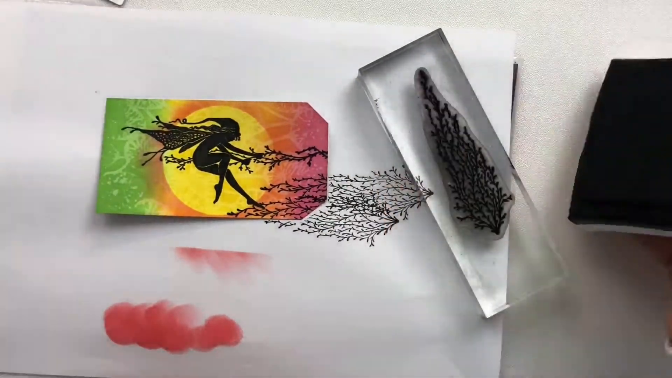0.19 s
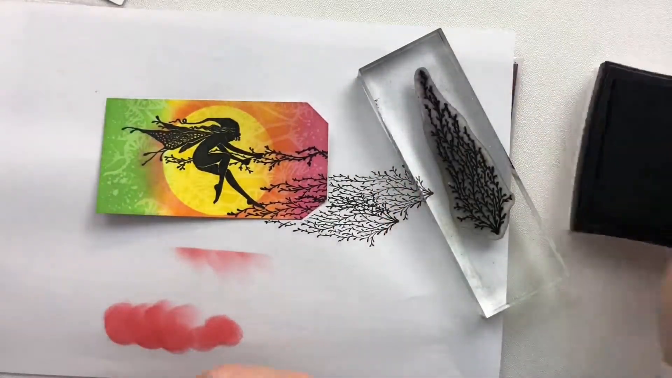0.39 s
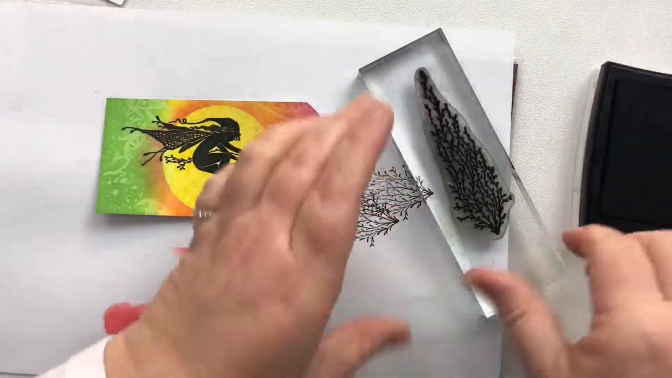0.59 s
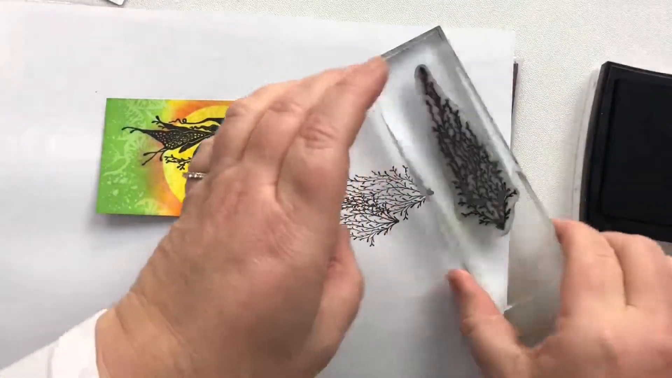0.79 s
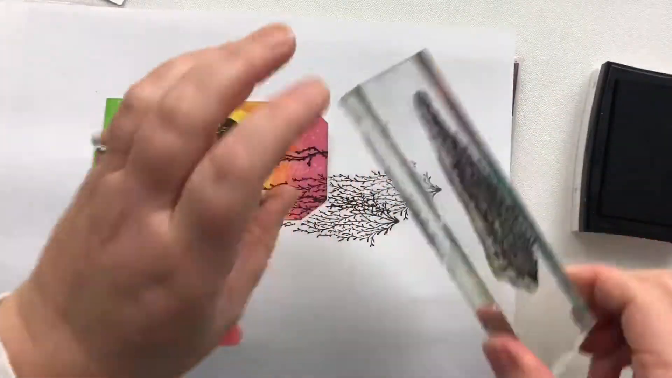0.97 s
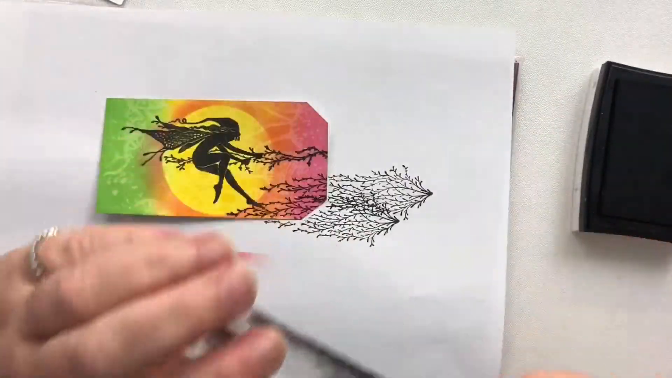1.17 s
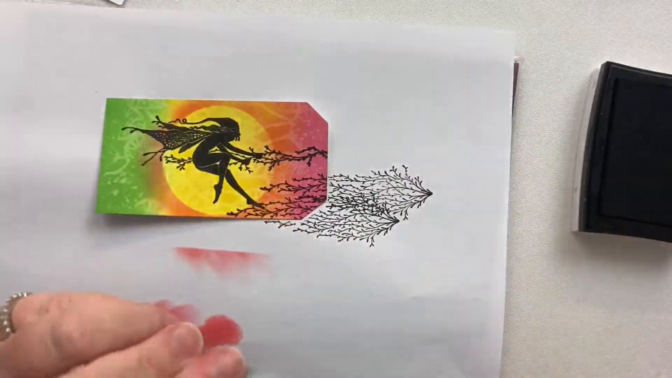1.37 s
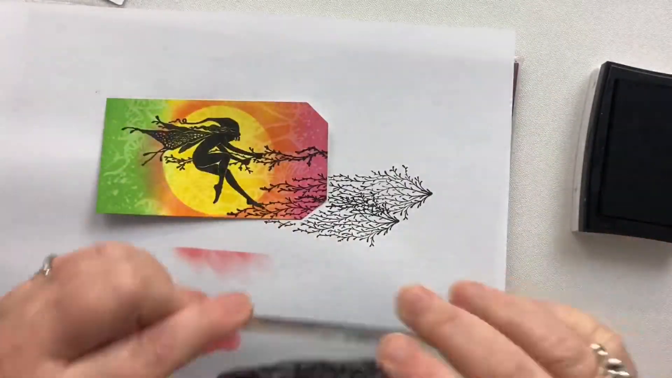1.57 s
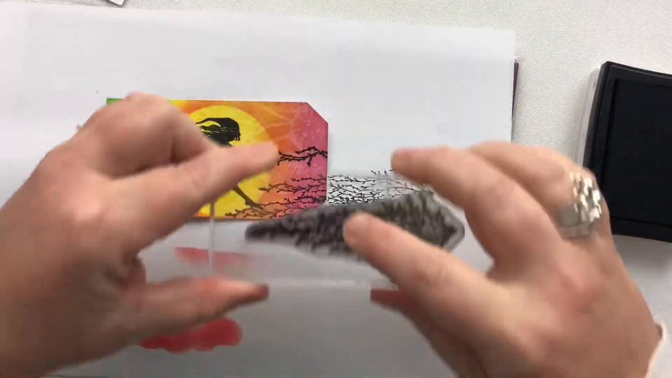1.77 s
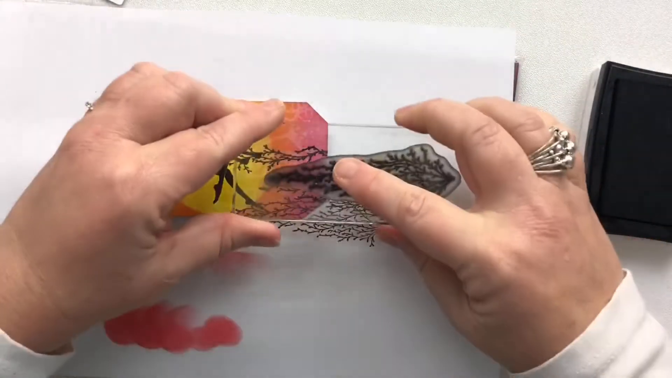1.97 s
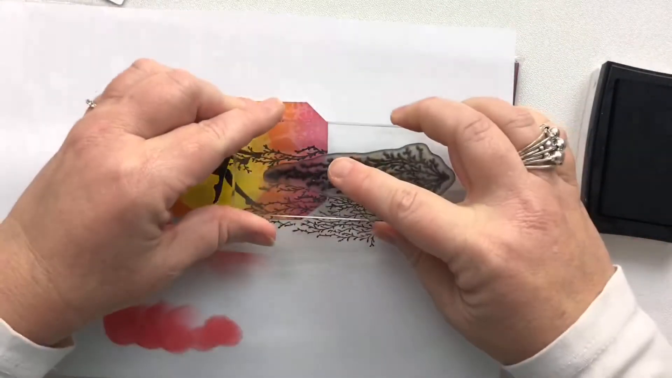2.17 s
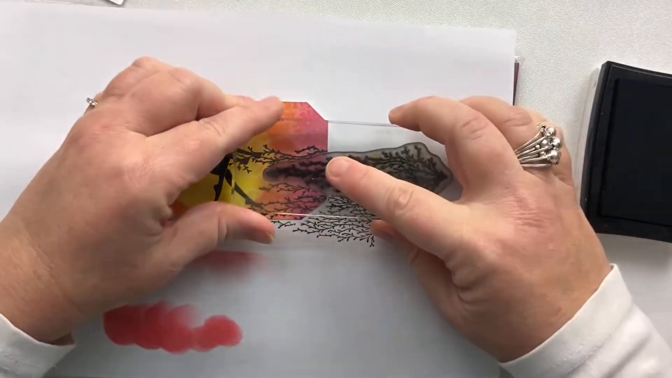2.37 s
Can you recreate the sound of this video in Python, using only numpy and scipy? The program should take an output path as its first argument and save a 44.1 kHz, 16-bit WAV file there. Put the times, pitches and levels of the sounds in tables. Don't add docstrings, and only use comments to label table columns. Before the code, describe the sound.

Hard plastic case drops on a craft desk with two rattling knocks, followed by small block clicks

```python
import sys
import numpy as np
from scipy import signal
from scipy.io import wavfile

SR = 44100
rng = np.random.default_rng(int(sys.argv[2]) if len(sys.argv) > 2 else 0)


def to_linear_factor(level_db):
    exponent = np.asarray(level_db, float) / 20
    return 10 ** exponent


def int16_out(signal):
    q = np.round(np.clip(np.atleast_2d(signal).T, -1, 1) * 32767)
    wavfile.write(sys.argv[1], SR, q.astype(np.int16))


N = 110250


def rms_one(x):
    return x / np.sqrt(np.mean(x ** 2) + 1e-20)


def in_time(rows):
    s, db = np.transpose(rows)
    return to_linear_factor(np.interp(np.arange(N) / SR, s, db))


def dying(t60_s, size):
    return to_linear_factor(-60 * np.arange(size) / SR / t60_s)


def high_pass(x, hz):
    return signal.sosfilt(signal.butter(2, hz, "high", fs=SR, output="sos"), x)


def band_noise(order, low_hz, high_hz, size):
    band = signal.butter(order, [low_hz, high_hz], "band", fs=SR, output="sos")
    return signal.sosfilt(band, rng.standard_normal(size))


def resonate(x, hz, width_hz):
    r = np.exp(-np.pi * width_hz / SR)
    for _ in range(2):
        x = signal.lfilter([1, 0, -1], [1, -2 * r * np.cos(2 * np.pi * hz / SR), r * r], x)
    return x


def hiss(hz, width_hz, size):
    settle = SR // 4
    return rms_one(resonate(rng.standard_normal(size + settle), hz, width_hz)[settle:])


def ring(x, hz, t60_s):
    r = to_linear_factor(-60 / (t60_s * SR))
    w = 2 * np.pi * hz / SR
    return signal.lfilter([0, np.sin(w)], [1, -2 * r * np.cos(w), r * r], x + 1e-18)


def knocks(rows):
    out = np.zeros(N)
    for s, db, hz, t60_s in rows:
        push = -to_linear_factor(db) * (np.arange(N) == int(s * SR))
        out += ring(push, hz, t60_s)
    return out


# (frequency [Hz], density [dB per Hz])
AIR = [(28, 0.5), (75, -4), (120, -12), (250, -19), (500, -21.5), (3000, -34.5), (7000, -34.5),
       (15000, -38)]


def room_air():
    edges = 21 * 2 ** np.arange(0, 9.8, .5)
    hz, db = np.transpose(AIR)
    air = np.zeros(N)
    for low, high in zip(edges, edges[1:]):
        level_db = np.interp(np.log(low * high) / 2, np.log(hz), db)
        air += to_linear_factor(level_db) * band_noise(2, low, high, N)
    return to_linear_factor(-64.5) * rms_one(air)


# (frequency [Hz], level [dB rms])
HUM = [(49.5, -55.5), (199, -80), (247, -80.5), (299, -73.5), (346, -83.5), (398, -80.5), (499, -81.5)]


def mains_hum():
    out = np.zeros(N)
    for hz, db in HUM:
        waver_db = 1.5 * hiss(2.1, 6, N)
        turns = hz * np.arange(N) / SR + rng.random()
        out += to_linear_factor(db + 2.5 + waver_db) * np.sin(2 * np.pi * turns)
    return out


# (time [s], level [dB])
SWAY = [(0.0, -33.5), (0.14, -36), (0.21, -33), (0.25, -44), (0.47, -42.5), (0.64, -36), (0.72, -44),
        (0.97, -53), (1.07, -35), (1.14, -38.5), (1.71, -52.5), (1.82, -41), (2.02, -52.5), (2.5, -51)]


def stand_sway():
    return in_time(SWAY) * rms_one(band_noise(3, 2.0, 8.8, N + SR)[SR:])


# (time [s], level [dB])
RUB = [(0, -77), (.1, -71), (.2, -57.5), (.42, -68.5), (.6, -57), (.72, -61.5), (.85, -68.5), (1.05, -68),
       (1.15, -69.5), (1.4, -75.5), (2.0, -77), (2.5, -89)]
# (frequency [Hz], width [Hz], level [dB])
PAPER = [(300, 460, -3), (650, 750, -6), (1590, 1200, -6), (3000, 1800, -2.5), (4970, 2600, -4),
         (6500, 1900, -0.5), (12500, 3300, -8.5)]
SCUFF_S = [.090, .175, .181, .182, .184, .785, .785, 1.33, 1.49, 1.59, 1.67, 1.67, 1.85, 2.19, 2.2, 2.275,
           .09, .72]
# (length [s], level [dB], frequency [Hz], width [Hz])
SCUFFS = [(.12, -68, 1380, 440), (0.013, -51, 754, 140), (0.035, -51, 1825, 190),
          (0.023, -58.5, 8850, 9700), (0.026, -53.5, 6000, 1530), (0.048, -58, 2500, 7300),
          (0.049, -62, 13000, 6200), (0.061, -72, 960, 3000), (0.039, -79, 13000, 3000),
          (0.039, -68, 12500, 4900), (0.15, -70.5, 1200, 6000), (0.35, -76.5, 12300, 3000),
          (0.16, -70.5, 830, 4040), (0.052, -74.5, 1070, 230), (0.068, -76, 3260, 4600),
          (0.0082, -74.5, 2500, 5900), (0.14, -68.5, 620, 400), (0.117, -62.5, 136, 170)]


def scuffs():
    t = np.arange(N) / SR
    grain = to_linear_factor(3.5 * np.clip(hiss(150, 220, N), -3, 3))
    rustle = sum(to_linear_factor(db) * hiss(hz, width_hz, N) for hz, width_hz, db in PAPER)
    out = in_time(RUB) * rms_one(rustle)
    for s, (length_s, db, hz, width_hz) in zip(SCUFF_S, SCUFFS):
        swell = np.exp(-((t - s) / length_s * 2) ** 2)
        out += to_linear_factor(db) * hiss(hz, width_hz, N) * swell
    return out * grain


# (time [s], peak level [dB], frequency [Hz], width [Hz], t60 [s])
TICKS = [(0.025, -49.5, 6500, 4000, .02), (.0300, -52.5, 6000, 760, 0.012),
         (0.074, -51.5, 1902, 2000, 0.013), (0.1076, -40, 5100, 4200, 0.03),
         (0.11, -45.5, 1500, 1460, 0.043), (0.1083, -46.5, 600, 500, .03),
         (0.1155, -46.5, 5650, 700, 0.015), (0.5273, -25, 9000, 8000, .008), (0.562, -31, 2500, 2500, .01),
         (.5612, -26, 12500, 3000, 0.0028), (0.5794, -30, 6800, 1800, 0.0059),
         (0.5809, -24, 12010, 4000, 0.0067), (.5850, -24.5, 1460, 1800, 0.0083),
         (0.58, -33, 12500, 3000, .006), (.7505, -55, 8100, 8900, 0.0068), (0.879, -41.5, 2200, 2446, 0.11),
         (0.88, -23, 7760, 4640, 0.0047), (0.884, -42.5, 6500, 14400, 0.13),
         (1.0650, -23.5, 3210, 802, 0.0014), (1.0654, -29, 4760, 1800, .002),
         (1.0654, -23, 6600, 1204, 0.0019), (1.068, -39.5, 1910, 600, 0.0033),
         (1.0688, -41, 3000, 4000, 0.0057), (1.091, -57, 3000, 5000, .01), (1.1820, -61, 5000, 6000, .01),
         (1.3600, -60, 2496, 2000, .01), (1.396, -56.5, 1398, 599, 0.026),
         (1.461, -53.5, 6570, 3990, 0.011), (1.564, -50.5, 13300, 2500, .09),
         (1.7450, -57, 13000, 2510, 0.021), (1.8600, -60, 8900, 2004, 0.013),
         (1.9105, -51.5, 6500, 914, 0.012), (2.1007, -53, 2380, 1200, 0.013), (2.1010, -58, 4500, 900, .01),
         (2.1013, -57.5, 3200, 900, .01), (2.1015, -55.5, 1500, 700, .015), (2.1030, -50.5, 820, 500, 0.03),
         (2.1040, -55.5, 498, 350, .08), (2.2720, -63.5, 1200, 555.6, .02), (2.2740, -57, 6500, 3000, .01)]


def ticks():
    out, size = np.zeros(N + SR), SR // 5
    click = np.arange(size) == 0
    for s, db, hz, width_hz, t60_s in TICKS:
        grit = 0.19 * rng.standard_normal(size) * dying(t60_s, size)
        tick = resonate(grit + click, hz, width_hz)
        i = int(s * SR)
        out[i:i + size] += to_linear_factor(db) * tick / np.abs(tick).max()
    return out[:N]


def echo(x):
    tail = rng.standard_normal(SR // 2) * dying(0.22, SR // 2)
    tail[:SR // 250] = 0
    return to_linear_factor(-14.5) * signal.fftconvolve(x, tail / np.sqrt(np.sum(tail ** 2)))[:N]


# (time [s], desk thud [dB], case knock [dB], case clack [dB], bright rattle [dB])
BLOWS = [(0.2206, -22, -8.5, -24.5, -29.5), (0.2217, -18.5, -16.5, -14.5, -10.5),
         (0.2617, -13.5, -9, -19, -15), (0.31, -26, -23, -24, -22), (0.3655, -37.5, -37, -37.5, -43.5),
         (0.402, -41.5, -50.5, -51, -47.5), (0.4427, -18.5, -8.5, -18.5, -20.5),
         (0.4478, -21, -9, -8, -6.5), (0.4963, -17, -20, -28.5, -26), (0.5263, -26.5, -23.5, -32.5, -32.5),
         (0.542, -29.5, -26, -37.5, -39), (0.6997, -43, -53, -51.5, -55)]
# (frequency [Hz], level [dB], t60 [s])
DESK = [(135, -15, 0.13), (190.75, -1.5, 0.053), (235.6, 1.5, 0.053), (312, -16.5, 0.072)]
# (frequency [Hz], level [dB], t60 [s])
KNOCK = [(491.5, -3.5, 0.051), (546, -9, 0.049), (643, -4, 0.019), (712, -6, 0.056), (822, -4.5, 0.025),
         (936, -8.5, 0.02), (1070, -12.5, 0.041), (1398, -4.5, 0.025)]
# (frequency [Hz], level [dB], t60 [s])
CLACK = [(1670, -1.5, 0.018), (1910, -6, 0.025), (2200, 1.5, 0.0078), (2911, -6, 0.048), (3575, -10, 0.03),
         (4080, -10, 0.03), (4537, -1.5, 0.015), (5210, -4, 0.035)]
# (frequency [Hz], level [dB], t60 [s])
RATTLE = [(5750, 0.5, 0.0035), (6350, 0, 0.008), (6800, -3.5, 0.024), (7620, -5, 0.0077), (8648, -7, .004),
          (10000, -9, 0.0062), (11196, -4, 0.0017), (12250, -6, .004), (13400, -10.5, 0.0037),
          (15220, -14, .004)]
CONTACT_S = (0.0003496, 0.00015, 0.00061, 0.00046)


def pad():
    buzz_db, buzz_t60_s = (-16.5, -7, -6, -3), (0.11, 0.14, 0.16, 0.11)
    out, size = np.zeros(N), SR // 2
    for g, modes in enumerate((DESK, KNOCK, CLACK, RATTLE)):
        t = np.arange(size) / SR / CONTACT_S[g]
        push = t * np.exp(-t) * (t < 12)
        chatter = to_linear_factor(buzz_db[g]) * dying(buzz_t60_s[g], size)
        for m, (hz, level_db, t60_s) in enumerate(modes):
            force = np.zeros(N + size)
            for row in BLOWS:
                i = int(row[0] * SR)
                grain = rng.standard_normal((2, size))
                if g < 2:
                    hit = push / push.sum() * 2
                else:
                    hit = push * grain[0] / np.sqrt(np.sum(push ** 2))
                buzz = chatter * grain[1] / np.sqrt(t60_s * SR / 10)
                force[i:i + size] += to_linear_factor(row[1 + g] + level_db - 5) * (hit + buzz)
            sign = (-1) ** (m * (g > 0))
            out += sign * ring(force[:N], hz, t60_s)
    return high_pass(out, 240)


# (time [s], peak level [dB], frequency [Hz], t60 [s])
RINGS = [(.2211, -12.5, 707, 0.06), (.2215, -25, 215, .05), (.2219, -20.5, 4545, .07),
         (.2220, -24.5, 9700, 0.039), (.2222, -23, 6700, .07), (.2224, -27.5, 2895, .1),
         (.2225, -17.5, 810, .04), (.2615, -17, 243, .08), (.2618, -23.5, 190, .2), (.2619, -20, 485, .06),
         (.2620, -24.5, 1560, .08), (.2622, -30, 4555, .05), (.2624, -16, 635, .06),
         (.2625, -25.5, 6356, 0.08), (.2626, -22, 780, 0.045), (.3104, -27, 1685, .14),
         (.3106, -28.5, 925, .08), (.3560, -37.5, 192, .15), (.3660, -39, 1730, .12),
         (.3950, -37, 150, .12), (.4435, -18, 483, .08), (.4445, -20, 655, .07), (.4449, -23, 197, .1),
         (.4451, -24.5, 243, .08), (.4470, -13.5, 1041, .08), (.4480, -21.5, 1352, .1),
         (.4484, -18.5, 2140, .05), (.4486, -15, 5272, .04), (.4489, -6.5, 4130, 0.036),
         (.4965, -15, 480, 0.06), (0.48, -30.5, 1670, 0.063), (.5420, -21.5, 483, 0.04)]


def case_rings():
    return high_pass(knocks(RINGS), 140)


# (time [s], peak level [dB], frequency [Hz], t60 [s])
BUMPS = [
    (0.23, -29, 56.2, 0.084),
    (0.602, -32, 45.14, 0.071),
    (0.52, -43.5, 90, .1),
    (1.0600, -44, 220, 0.036),
    (1.064, -26, 25.75, 0.063),
    (1.0655, -46.5, 125, 0.045),
    (1.0657, -46, 410, 0.029),
    (1.0660, -48.5, 710, 0.024),
    (1.390, -47, 45, 0.08),
    (1.396, -52.5, 200, .04),
]


def stand_bumps():
    return knocks(BUMPS)


def scene():
    small = ticks()
    case = pad() + case_rings()
    room = room_air() + mains_hum() + stand_sway()
    reflected = echo(case + 0.2 * small)
    return (room + scuffs() + small + reflected + case + stand_bumps())[None]


def low_pass(x):
    return signal.sosfilt(signal.butter(12, 16850, fs=SR, output="sos"), x)


def record(dry):
    rounded = .9 * np.tanh(dry / .9)
    top_cut = signal.cheby2(10, 50, 16000 + 800, fs=SR, output="sos")
    mix = signal.sosfilt(top_cut, rounded)
    return low_pass(mix)


dry = scene()
out = record(dry)
int16_out(out)
```